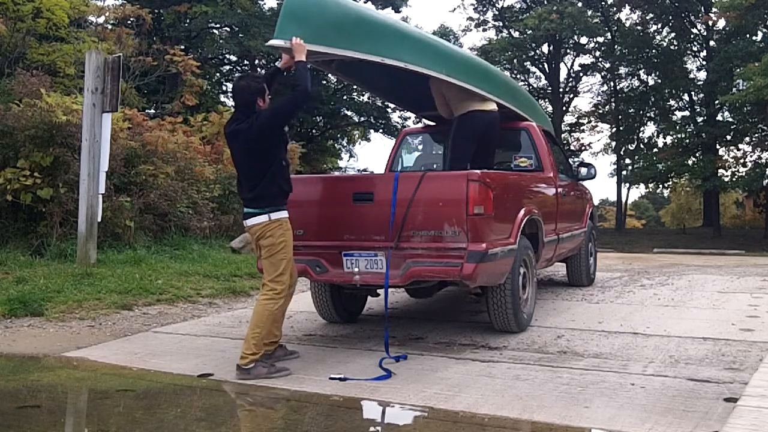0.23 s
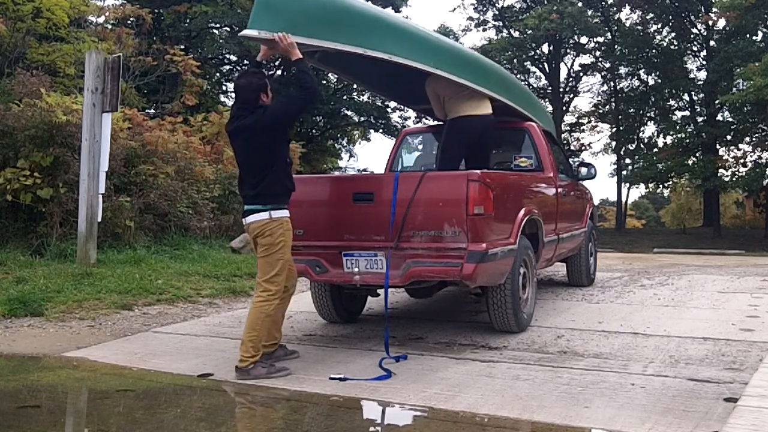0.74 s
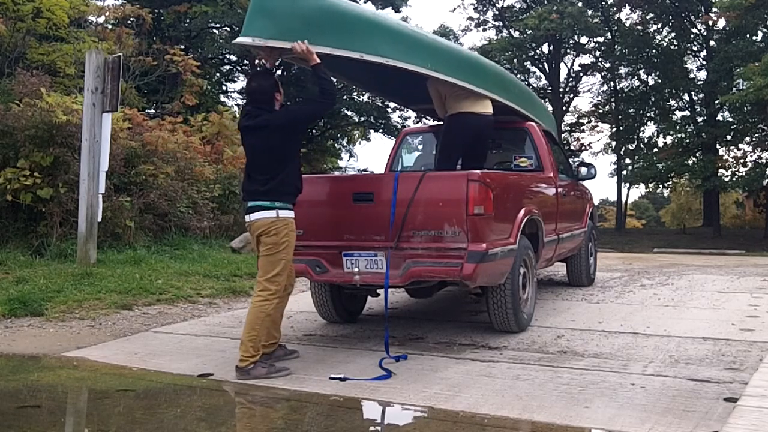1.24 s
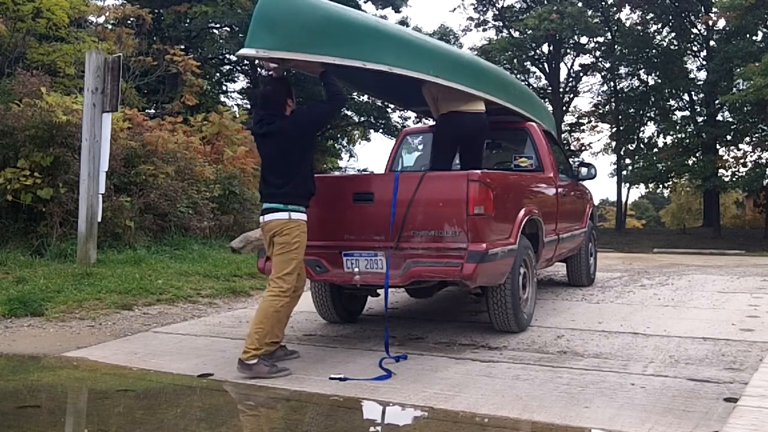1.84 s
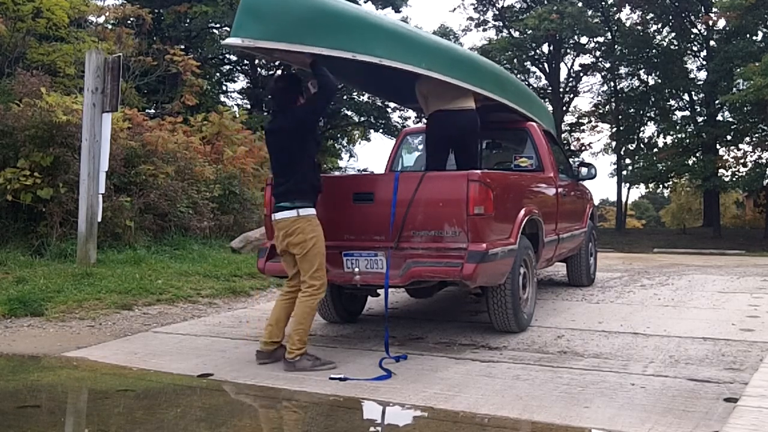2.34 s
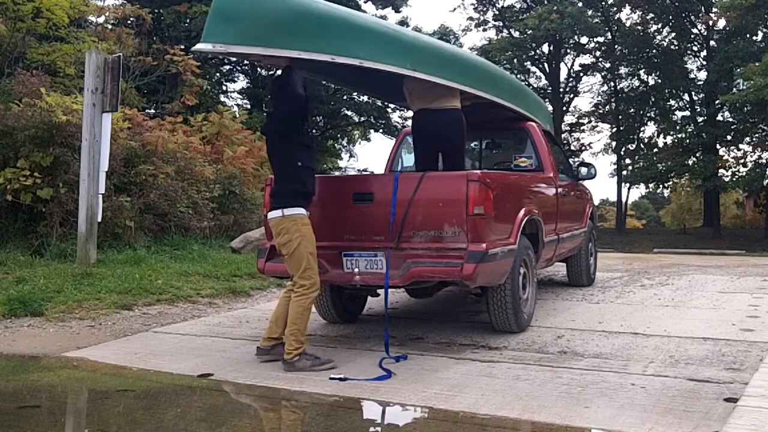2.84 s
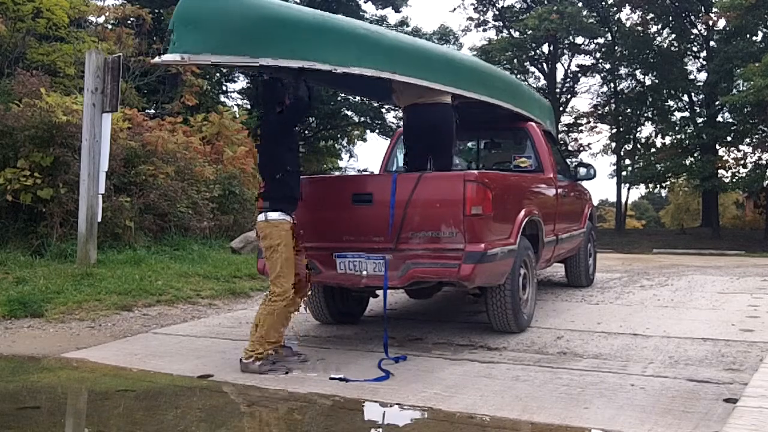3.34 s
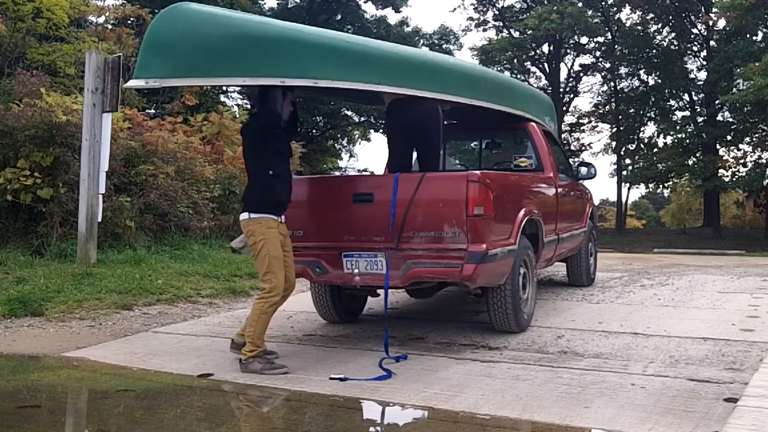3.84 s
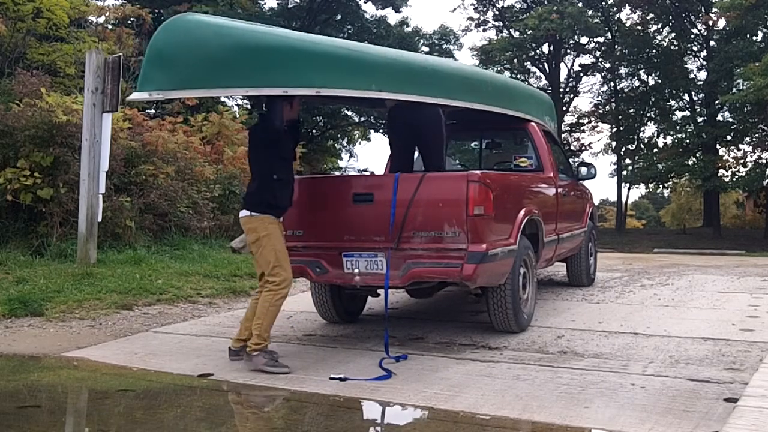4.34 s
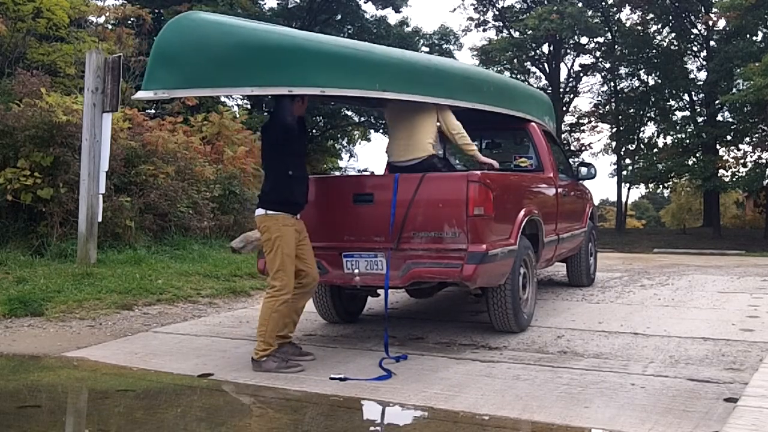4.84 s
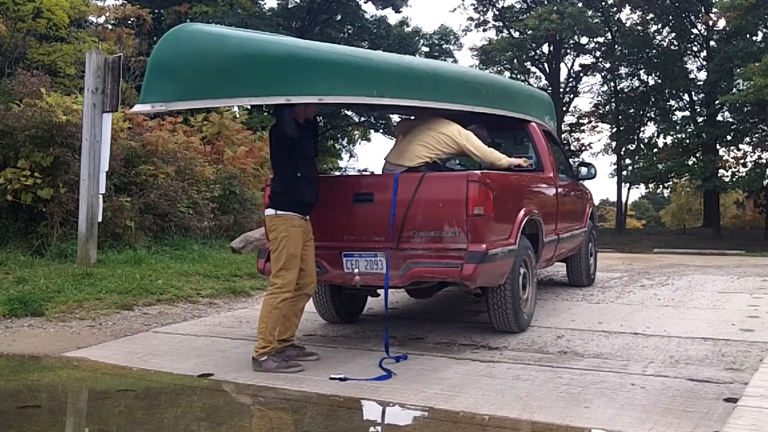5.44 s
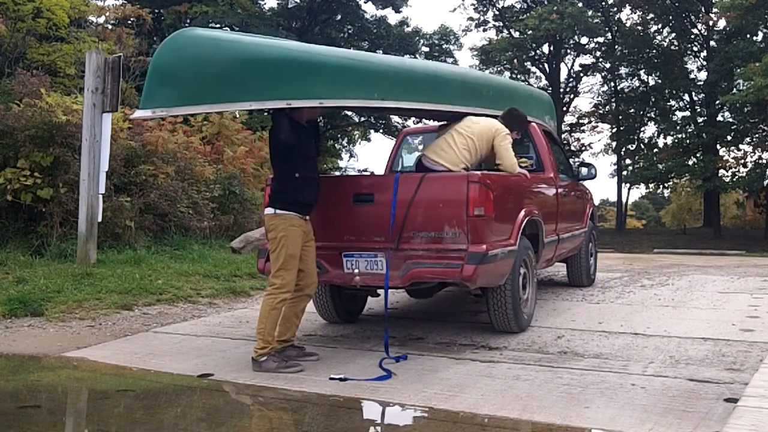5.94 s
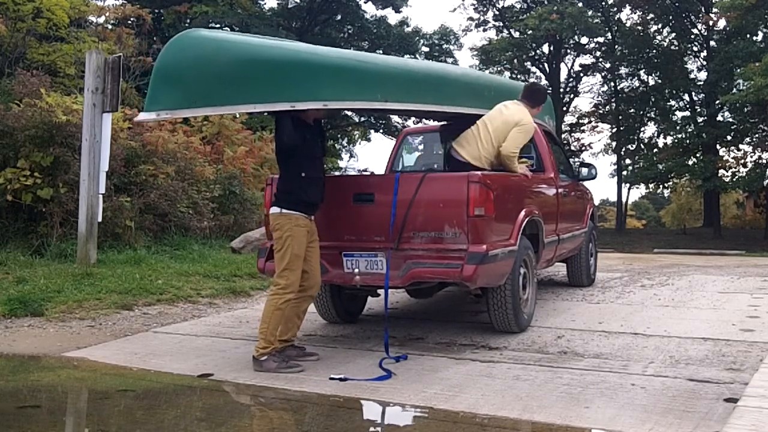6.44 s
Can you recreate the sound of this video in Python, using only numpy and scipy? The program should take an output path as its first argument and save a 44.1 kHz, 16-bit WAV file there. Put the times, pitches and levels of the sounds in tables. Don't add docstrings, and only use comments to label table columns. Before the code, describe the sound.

Open air at a paved boat launch by trees, heard on a small, slightly hissy camera microphone near a truck. Light wind and far traffic rumble softly; a high thin cricket pulses until about 1.6 s. Distant hoarse jays call at 0.1, 0.5 and 0.6 s. A shoe scuffs at 0.6, then hollow canoe-hull booms cluster at 1.0-1.2 s, with dull metallic buckle ticks between 0.9 and 2.3. A near jay screams at 1.3, 2.75, 3.6, 4.6 and 5.9 s, each about a third of a second, piercing, harmonic, raspy at the ends, ringing in the woods. A gritty step and tap land at 2.4; knocks and scuffs follow near 3.0-3.8, with gunwale rubbing strongest about 3.4-4.0. Far jays answer at 4.1, 4.45, 5.25 and 5.65. Sharp taps at 4.6 and 5.0, a thump at 5.7, and softer knocks, rubbing and scuffs finish by 6.5.

```python
import sys
import numpy as np
from scipy import signal
from scipy.fft import rfft, irfft
from scipy.io import wavfile
from scipy.ndimage import uniform_filter1d

SR = 44100
rng = np.random.default_rng(int(sys.argv[2]) if len(sys.argv) > 2 else 0)


def wav_record(signal):
    frames = np.transpose(np.atleast_2d(signal))
    bounded = np.clip(frames, -1, 1)
    quanta = np.round(bounded * 32767).astype(np.int16)
    wavfile.write(sys.argv[1], SR, quanta)


def invert_db(x):
    u = np.asarray(x, float) / 20
    return 10 ** u


N = 294706


def rms_one(x):
    return x / np.sqrt(np.mean(x ** 2) + 1e-20)


def band(x, low_hz, high_hz, order=2):
    return signal.sosfilt(signal.butter(order, [low_hz, high_hz], "band", fs=SR, output="sos"), x)


def coloured(x, spectrum):
    hz, level_db = np.transpose(spectrum)
    grid = np.maximum(np.arange(len(x) // 2 + 1) * SR / len(x), 1)
    gain_db = np.interp(np.log(grid), np.log(hz), level_db, -120, -120)
    return irfft(rfft(x) * invert_db(gain_db), len(x))


def drift(rate_hz, size):
    r = np.exp(-2 * np.pi * rate_hz / SR)
    noise = rng.standard_normal(size + SR // 2)
    return rms_one(signal.lfilter([1], [1, -2 * r, r * r], noise)[SR // 2:])


def ramp(t, span_s):
    return np.clip(t / span_s, 0, 1)


def stretch(rows):
    s, *columns = np.transpose(rows)
    start = round(s[0] * SR)
    t = np.arange(start, round(s[-1] * SR)) / SR
    edge = np.clip(np.minimum((t - s[0]) / 0.003, (s[-1] - t) / 0.018), 0, 1)
    return start, edge, [np.interp(t, s, c) for c in columns]


def add(out, start, x):
    out[start:start + len(x)] += x[:N - start]


def woods(x, t60, first_s):
    t = np.arange(SR) / SR
    echoes = rng.standard_normal(SR) * invert_db(-60 * t / t60) * np.clip((t - first_s) / 0.0039, 0, 1)
    return signal.fftconvolve(x, echoes / np.sqrt(np.sum(echoes ** 2)))


# [f/Hz, level/dB per Hz]
HISS_COLOUR = [(4710, -60), (8000, -12.5), (8420, -13), (8770, -7.5), (9750, -5.5), (12100, -4),
               (13400, -5.5), (14700, -8.5), (15300, -13)]


def microphone_hiss():
    frame = np.arange(N) * 29.97 / SR % 1
    buzz = rng.standard_normal(1472)[(frame * 1472).astype(int)]
    return invert_db(-69.5) * rms_one(coloured(rng.standard_normal(N) + 0.55 * buzz, HISS_COLOUR))


# [f/Hz, level/dB per Hz]
AIR_COLOUR = [(12, -78), (20, 13), (37, -1), (106, -2), (407, -18.5), (705, -19), (1080, -23.5),
              (1560, -22.5), (2570, -25), (3140, -20), (3560, -26), (5040, -23), (5570, -30), (6630, -31.5),
              (7700, -42.5), (10000, -71), (16900, -120)]
# [t/s, level/dB]
GUSTS = [(0.0, -59), (1.95, -53.5), (2.55, -69), (2.92, -53.5), (3.24, -51), (3.63, -65.5), (4.82, -52),
         (5.02, -63.5), (5.38, -56.5), (5.75, -64.5), (6.31, -53.5), (6.68, -58)]
LEAVES_FOLLOW = 0.05


def outdoors():
    s, rumble_db = np.transpose(GUSTS)
    gust_db = rumble_db - np.mean(rumble_db)
    air = rfft(coloured(rng.standard_normal(N), AIR_COLOUR))
    octave = np.log2(np.maximum(np.arange(len(air)) * SR / N, 1) / 16)
    t, out = np.arange(N) / SR, 0
    for k in range(11):
        low_share = np.clip(1 - k / 3, 0, 1)
        swell_db = (low_share + (1 - low_share) * LEAVES_FOLLOW) * gust_db
        part = irfft(air * np.clip(1 - np.abs(octave - k), 0, 1), N)
        flicker_db = (0.4 + low_share) * drift(6, N)
        out = out + part * invert_db(np.interp(t, s, swell_db) + flicker_db)
    return invert_db(-51) * rms_one(out)


# [t/s, level/dB]
CRICKET_LEVEL = [
    (0, -73),
    (1.0, -71),
    (1.55, -70),
    (1.62, -78),
]


def cricket():
    t = np.arange(N) / SR
    pulses = np.maximum(np.sin(2 * np.pi * 35 * t), 0) ** 2
    pulses = (0.45 + pulses) * invert_db(2.5 * drift(4.1, N))
    song = rms_one(pulses * band(rng.standard_normal(N), 11700, 15000))
    return invert_db(np.interp(t, *np.transpose(CRICKET_LEVEL))) * song


# [t/s, length/s, level/dB, throat f/Hz, 2nd partial f/Hz]
FAR_LOW_CALLS = [(.135, 0.22, -50.5, 2560, 965), (4.1, 0.37, -56.5, 1900, 968)]
FAR_HIGH_CALLS = [(.495, 0.11, -51, 3330, 1690), (.62, 0.13, -57.5, 3800, 1750),
                  (5.252, 0.095, -49.5, 3330, 1713), (5.645, 0.14, -53.5, 3230, 1698)]
FAR_LOUD_CALLS = [(4.452, .21, -43, 2520, 1858)]
# [attack/s, fade/dB per s, throat glide/octaves per s, pitch glide/octaves per s]
FAR_MANNERS = [(0.029, -83, -1.5, .03), (0.016, -70, -4, -2.0), (0.03, -69, 2.1, .35)]
FAR_SHAKE = [1.05, 1.0, 1.3]


def far_jays():
    out = np.zeros(N)
    # calls, throat slope dB per octave, half-line dB, 2nd partial dB
    voices = ((FAR_LOW_CALLS, -10, -6, -20), (FAR_HIGH_CALLS, -36, -2, -11), (FAR_LOUD_CALLS, -14, -5, 2.3))
    for voice, manner, shake_rad in zip(voices, FAR_MANNERS, FAR_SHAKE):
        calls, slope_db, half_db, second_db = voice
        attack, fade_db, throat_glide, glide = manner
        for s, length, db, throat_hz, second_hz in calls:
            start, edge, (t,) = stretch([(s, 0), (s + length, length)])
            size = len(t)
            db = db - 16 * (1 - ramp(t, attack)) + fade_db * np.maximum(t - attack, 0)
            throat_hz = throat_hz * 2 ** (throat_glide * t)
            second_hz = second_hz * 2 ** (glide * t)
            phase, call = np.pi * np.cumsum(second_hz) / SR, 0
            for k in np.arange(2, 10, 0.5):
                octaves = np.log2(k * second_hz / 2 / throat_hz)
                level_db = slope_db * np.maximum(-octaves, 1.82 * octaves) + half_db * (k % 1 > 0)
                if k == 2:
                    level_db = second_db
                partial = np.sin(k * phase + shake_rad * drift(102, size))
                call = call + invert_db(level_db + 3 * drift(40, size)) * partial
            add(out, start, invert_db(db) * edge * rms_one(call))
    return out + invert_db(-5) * woods(out, t60=0.92, first_s=0.0094)[:N]


# [t/s, length/s, level/dB]
RUBS_ON_RACK = [(.55, 0.44, -66), (2.95, 0.31, -61), (3.419, 0.58, -57.5), (4.4, 0.21, -61),
                (6.118, .3, -60.5)]


def rubbing():
    out = np.zeros(N)
    for s, length, db in RUBS_ON_RACK:
        size = round(length * SR)
        drag = rms_one(band(rng.standard_normal(size), 450, 1900, order=1))
        add(out, round(s * SR), invert_db(db + 2.7 * drift(9.2, size)) * np.hanning(size) * drag)
    return out


# [t/s, peak level/dB]
BUCKLE_TICKS = [(0.895, -44.5), (0.938, -44), (1.737, -40.5), (1.902, -53), (2.066, -45), (2.265, -50)]


def buckle():
    out, t = np.zeros(N), np.arange(SR // 30) / SR
    for s, db in BUCKLE_TICKS:
        add(out, round(s * SR), invert_db(db - 60 * t / 0.014) * np.sin(2 * np.pi * 1420 * t))
    return out


# [t/s, peak level/dB, length/s, colour f/Hz, colour level/dB]
SHOE_SCUFFS = [(0.564, -40.5, 0.21, 1790, -10), (1.037, -46, 0.022, 1130, -1.5),
               (1.058, -43, 0.041, 2980, -16), (1.219, -42.5, 0.052, 3000, -16),
               (1.287, -48.5, 0.015, 3040, 9.5), (1.944, -53.5, 0.13, 3420, 2),
               (2.255, -44.5, 0.016, 1520, -21), (2.391, -31.5, 0.025, 1570, -15.5),
               (3.042, -59, 0.0055, 1010, -4), (3.376, -37, 0.03, 1560, -14), (3.383, -43, 0.14, 3310, -30),
               (4.605, -47, .025, 1000, -8), (5.036, -38, 0.031, 1880, -14),
               (5.725, -39, 0.033, 1210, -10.5), (6.044, -57.5, 0.032, 5500, 0),
               (6.393, -49.5, .02, 2500, -4), (6.518, -47.5, 0.015, 5000, -1.5)]
# [f/Hz, level/dB per Hz]
GRIT_COLOUR = [(240, 7.5), (400, -10.5), (748, -6), (1660, -9.5), (2810, -2.5), (5870, -11.5),
               (7500, -20.5), (9750, -66)]


def scuffs():
    out, t = np.zeros(N), np.arange(SR // 5) / SR
    for s, db, length, hz, colour_db in SHOE_SCUFFS:
        grains = rng.standard_normal(len(t)) * invert_db(7.1 * rng.standard_normal(len(t)))
        grains = rms_one(coloured(grains, GRIT_COLOUR))
        shoe = rms_one(band(grains, hz * 0.75, min(hz * 1.33, 7500)))
        crunch = grains + invert_db(colour_db + 5.5) * shoe
        shape = np.clip(t / 0.002, 0, 1) * invert_db(-80 * t - 730 * np.maximum(t - length, 0))
        add(out, round(s * SR), invert_db(db - 13) * shape * crunch)
    return out


# [t/s, peak level/dB, centre f/Hz, t60/s]
HULL_KNOCKS = [(0.569, -54, 172, 1), (0.96, -37, 326, 0.38), (1.068, -27.5, 425, 0.42),
               (1.1, -32, 340, .42), (1.137, -30.5, 238, 0.5), (1.219, -41.5, 306, 0.94),
               (1.742, -37, 179, 0.56), (1.893, -42.5, 246, .6), (2.067, -41, 197, 0.31),
               (2.629, -50.5, 197, 0.98), (3.12, -42, 307, .55), (3.302, -44, 172, 0.49),
               (3.469, -48, 260, 0.8), (3.606, -39.5, 235, 0.59), (3.798, -46, 163, 0.31),
               (4.18, -43, 154, 0.35), (4.279, -40, 210, 0.63), (4.849, -75, 199, 0.23),
               (5.732, -36, 217, 0.54), (5.8, -43, 188, .47), (6.091, -58, 167, 0.56),
               (6.304, -42, 205, 0.97), (6.399, -52.5, 236, 0.87)]
# [t/s, peak level/dB, centre f/Hz, t60/s]
HULL_TAPS = [(1.068, -28, 420, .06), (1.0845, -32, 420, 0.051), (1.097, -36, 400, 0.05),
             (2.393, -40, 327, 0.13), (3.037, -40, 306, 0.23), (3.371, -32.5, 330, 0.049),
             (4.616, -41, 290, 0.16), (5.038, -31.5, 400, 0.098), (5.066, -45, 380, 0.048)]
# [multiple of centre f, level/dB, share of t60]
SHELL_BANDS = [(.65, -15, 3.3), (0.999, 1, 0.85), (1.6, -3.5, 0.73), (2.6, -12, 0.7), (4.2, -8.5, 0.21)]


def hull():
    out = np.zeros(N)
    strikes = [(row, -2.1, -5) for row in HULL_KNOCKS] + [(row, 2, -1.5) for row in HULL_TAPS]
    for (s, db, centre_hz, t60), blow_db, upper_db in strikes:
        blow_db = blow_db - 0.44 * (db + 36.5)
        upper_db = upper_db - 0.45 * (db + 39)
        t = np.arange(round(min(0.5, 2 * t60) * SR)) / SR
        sound = invert_db(blow_db - 60 * t / 0.021) * np.sin(2 * np.pi * 1.116 * centre_hz * t)
        for multiple, level_db, share in SHELL_BANDS:
            hz = multiple * centre_hz
            crowd = rms_one(band(rng.standard_normal(len(t)), hz * 0.71, hz * 1.165))
            swell = np.clip(t * hz / 2.3, 0, 1)
            decay_db = level_db - 6.5 + upper_db * (multiple > 1.2) - 60 * t / (share * t60)
            sound += invert_db(decay_db) * swell * crowd
        add(out, round(s * SR), invert_db(db) * sound)
    return out


# [t/s, pitch f/Hz, 4th partial level/dB]
SCREAMS = [
    [(1.332, 788, -70), (1.358, 802, -54), (1.396, 848.3, -38), (1.448, 844.4, -40), (1.464, 837, -48),
     (1.54, 808.6, -43.5), (1.65, 787, -46), (1.69, 807, -60)],
    [(2.752, 664, -73), (2.766, 780, -57), (2.79, 845.7, -40.5), (2.832, 836.7, -41.5), (2.872, 821, -46.5),
     (2.912, 798.3, -39), (3.0, 787.3, -46.5), (3.086, 808, -47), (3.115, 750, -50)],
    [(3.588, 665, -54), (3.6, 781, -51), (3.62, 850.6, -48), (3.674, 840.6, -39), (3.712, 822, -51.5),
     (3.752, 818.6, -39.5), (3.866, 806, -43), (3.928, 763, -49), (3.99, 782, -52)],
    [(4.565, 804, -51), (4.593, 825.3, -46.5), (4.673, 811, -44), (4.791, 785.6, -44.5), (4.817, 783, -68),
     (4.851, 793.5, -60), (4.915, 760, -37)],
    [(5.89, 725, -66), (5.912, 802.6, -41), (5.99, 792.7, -49.5), (6.043, 791, -40.5), (6.137, 770, -53),
     (6.161, 746, -62), (6.24, 755, -45)],
]
# [multiple of pitch, level/dB]
LOWER_PARTIALS = [(2, -14.5), (3, -1)]
UPPER_PARTIALS = [(5, 5.5), (6, -5), (7, -12), (8, -7.5), (9, -18)]
# [f/Hz, level/dB per Hz]
RASP_COLOUR = [(1400, -17), (2200, 0), (3200, 5.5), (4300, -2), (5300, -8.5), (7000, -29)]
SCREAM_ECHO_DB = [-9, -7.5, -9, -9, -7.5]
SCREAM_VOICE_DB = [-51.5, -51.5, -53.5, -53, -56]
SCREAM_BRIGHT_DB = [0, 1, -1, -8, -3.5]


def jay():
    out = np.zeros(N)
    screams = zip(SCREAMS, SCREAM_ECHO_DB, SCREAM_VOICE_DB, SCREAM_BRIGHT_DB)
    for rows, echo_db, voice_db, bright_db in screams:
        start, edge, (hz, db) = stretch(rows)
        size = len(hz)
        since = np.arange(size) / SR
        left = since[::-1]
        low_db = voice_db - 26 * (1 - ramp(left, 0.046)) - 8 * (1 - ramp(since, 0.027))
        high_db = low_db + bright_db - 8.5 - 14 * (1 - ramp(since, 0.062))
        colour_db = {2: -2.5 * (1 - ramp(since, 0.13)),
                     5: -0.43 * np.abs(hz - 805)}
        onset_db = 15 * np.exp(-since / 0.03)
        breakup_db = 14.5 * np.exp(-((left - 0.032) / 0.04) ** 2)
        rasp_db = voice_db - 11.5 + onset_db + breakup_db
        phase = 2 * np.pi * np.cumsum(hz * (1 + 0.0015 * drift(50, size))) / SR
        call = np.sin(4 * phase) * invert_db(db + 1.9 * drift(30, size))
        for partials, tilt_db in ((LOWER_PARTIALS, low_db), (UPPER_PARTIALS, high_db)):
            for k, level_db in partials:
                waver_db = (2.2 if k in (3, 5) else 3.8) * drift(18, size)
                call += np.sin(k * phase) * invert_db(level_db + tilt_db + colour_db.get(k, 0) + waver_db)
        rasp = rms_one(coloured(rng.standard_normal(size), RASP_COLOUR)) * invert_db(rasp_db)
        call = edge * (np.sqrt(2) * call + rasp)
        add(out, start, call)
        into_woods = band(call, 2630, 4350) + invert_db(-1) * call
        add(out, start, invert_db(echo_db) * woods(into_woods, t60=0.84, first_s=0.0061))
    return out


def scene():
    boat = hull() + scuffs() + buckle() + rubbing()
    boat_echo = invert_db(-12.5) * woods(boat, t60=0.25, first_s=0.024)[:N]
    land = jay() + far_jays() + boat + boat_echo
    land = signal.sosfilt(signal.butter(8, 7200, fs=SR, output="sos"), land)
    return (land + outdoors() + cricket())[None]


# [f/Hz, width f/Hz]
PORT_DIPS = [(7880, 930), (8270, 34), (11850, 270)]


def microphone_port(x):
    for hz, width in PORT_DIPS:
        x = signal.lfilter(*signal.iirnotch(hz, hz / width, SR), x)
    return x


# [low f/Hz, high f/Hz, threshold level/dB]
HOLLOW_BANDS = [(3540, 3860, -45), (7150, 8600, -44.5)]


def hollow_out(x):
    power = uniform_filter1d(band(x[0], 2900, 3500) ** 2, size=1536)
    spectrum, grid = rfft(x[0]), np.arange(N // 2 + 1) * SR / N
    for low_hz, high_hz, threshold_db in HOLLOW_BANDS:
        lost = np.clip(power / invert_db(threshold_db) ** 2 - 1, 0, 1)
        x = x - lost * irfft(spectrum * (grid > low_hz) * (grid < high_hz), N)
    return x


def top_cut(x):
    return signal.sosfilt(signal.butter(12, 15510, fs=SR, output="sos"), x)


def record(dry):
    x = microphone_port(dry + microphone_hiss())
    return top_cut(hollow_out(x))


dry = scene()
out = record(dry)
wav_record(out)
```